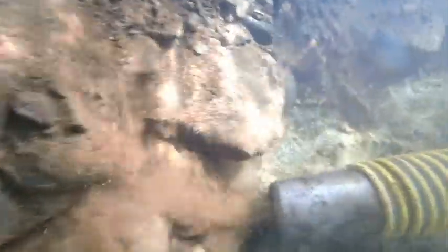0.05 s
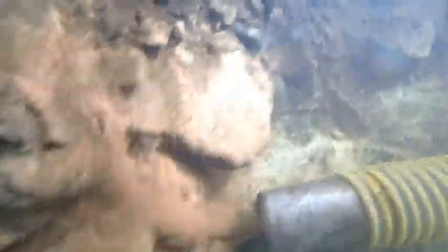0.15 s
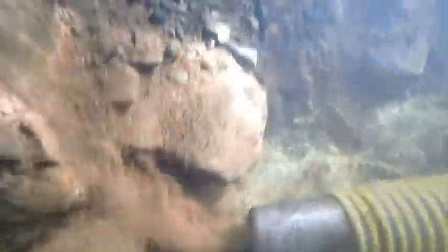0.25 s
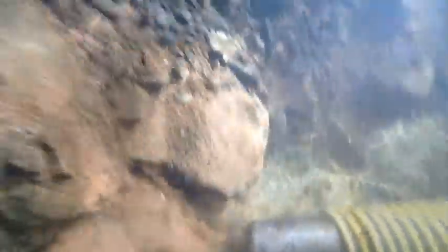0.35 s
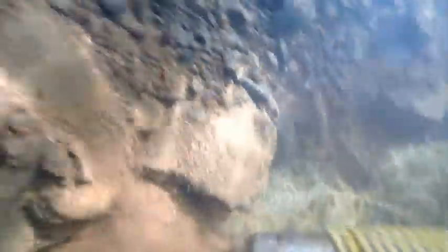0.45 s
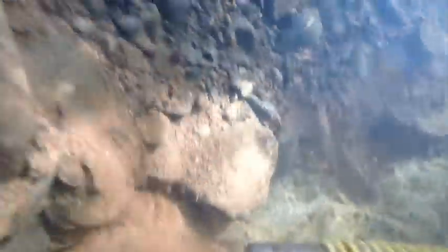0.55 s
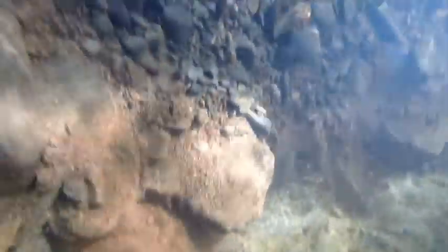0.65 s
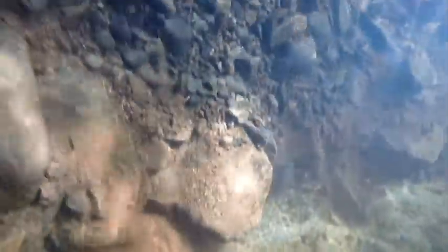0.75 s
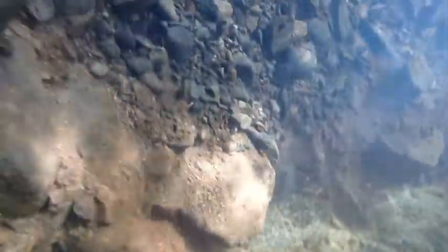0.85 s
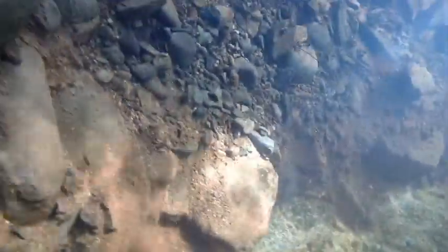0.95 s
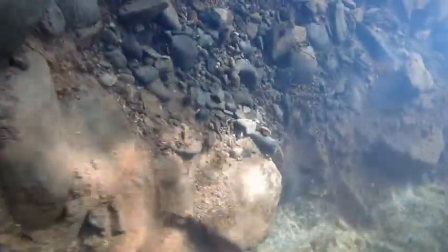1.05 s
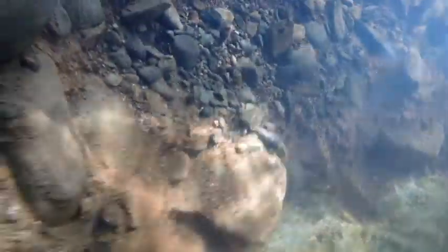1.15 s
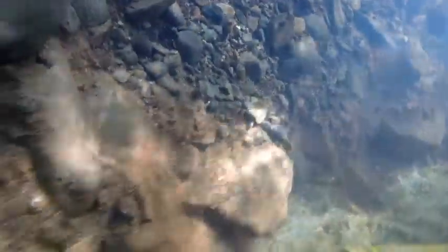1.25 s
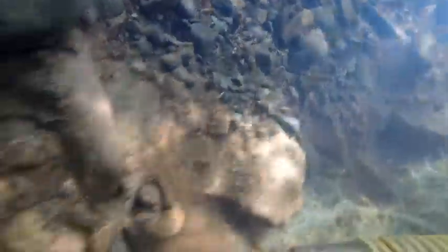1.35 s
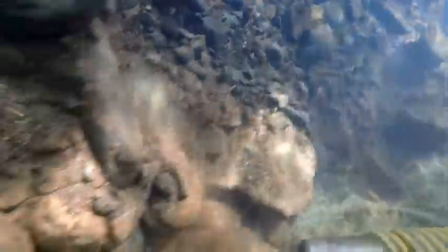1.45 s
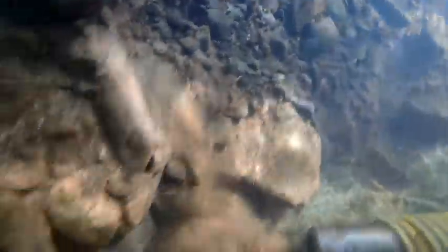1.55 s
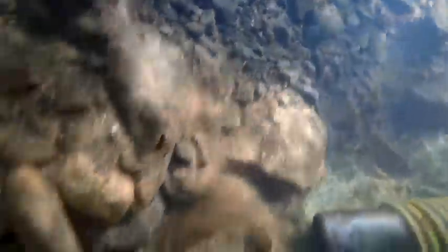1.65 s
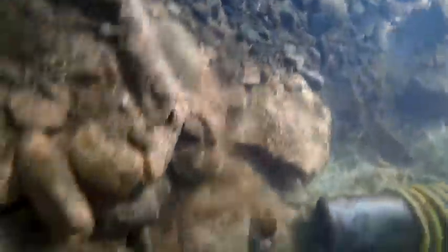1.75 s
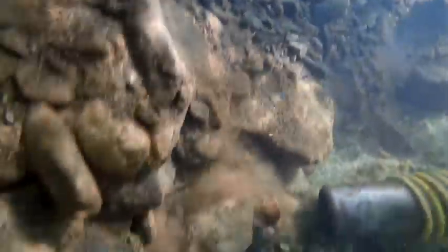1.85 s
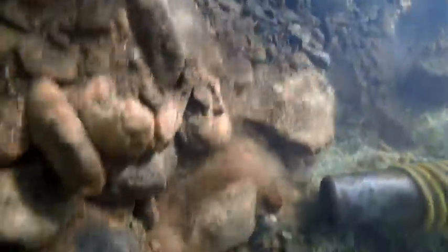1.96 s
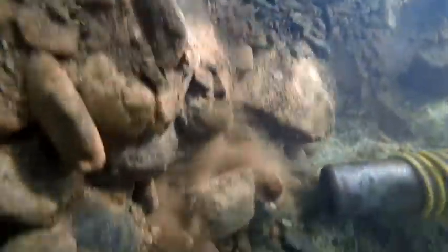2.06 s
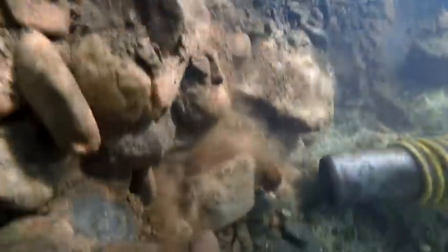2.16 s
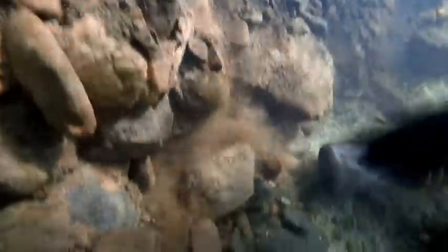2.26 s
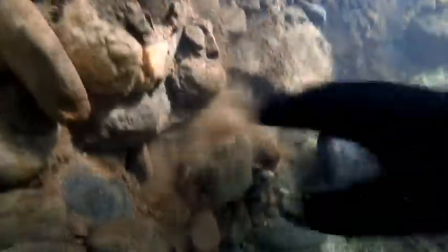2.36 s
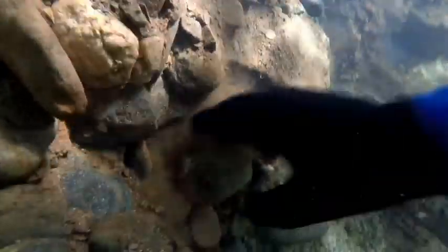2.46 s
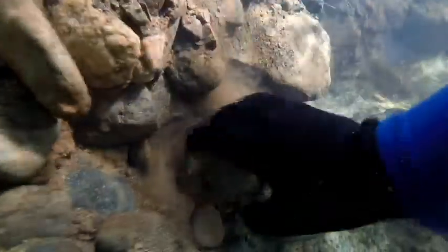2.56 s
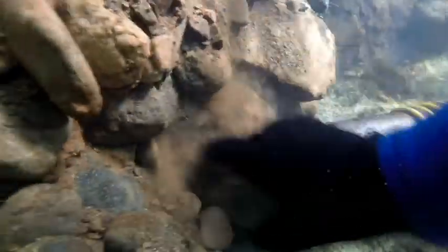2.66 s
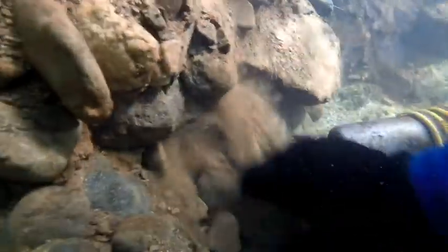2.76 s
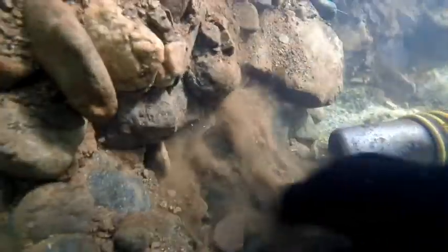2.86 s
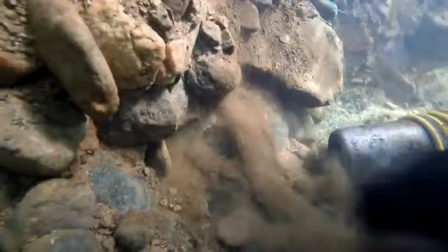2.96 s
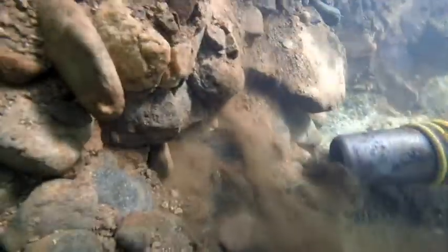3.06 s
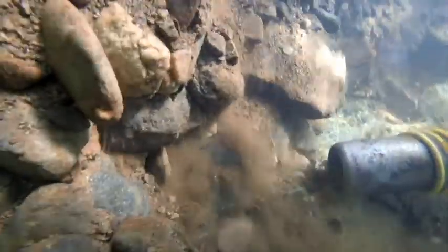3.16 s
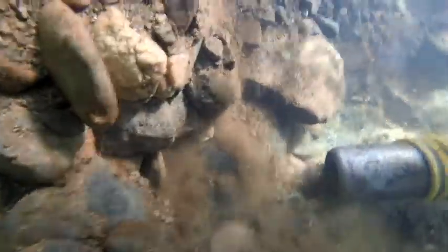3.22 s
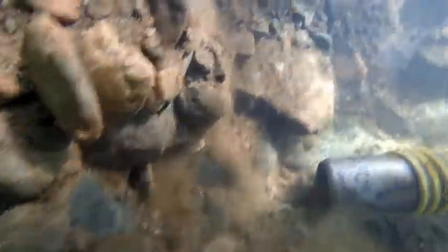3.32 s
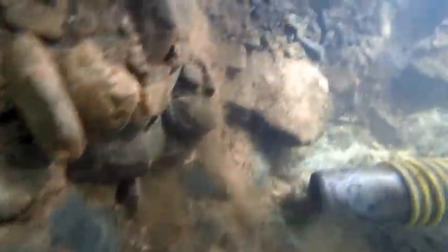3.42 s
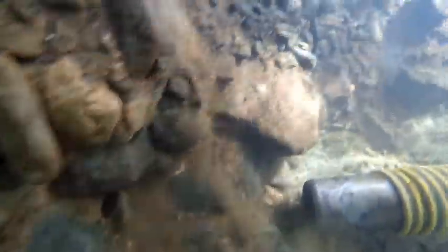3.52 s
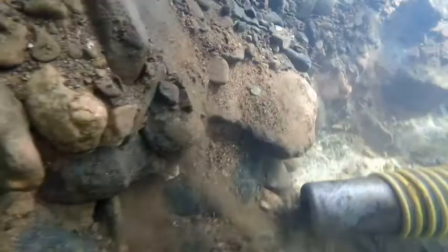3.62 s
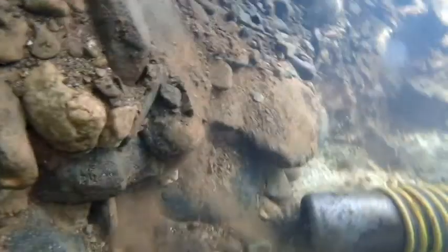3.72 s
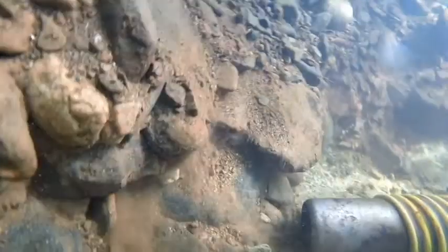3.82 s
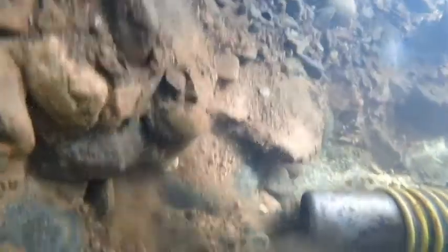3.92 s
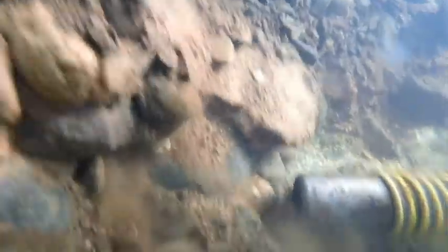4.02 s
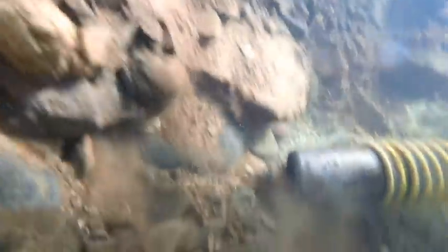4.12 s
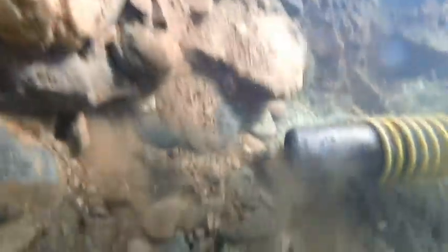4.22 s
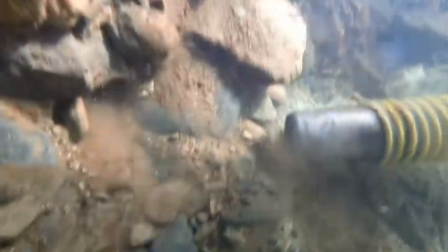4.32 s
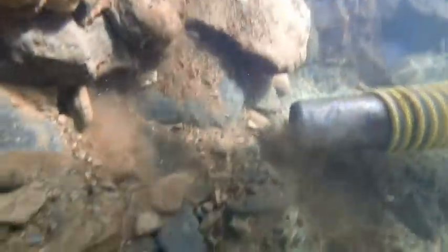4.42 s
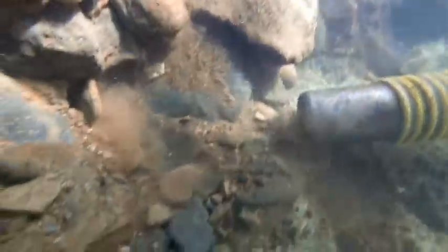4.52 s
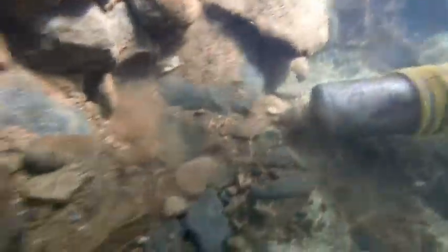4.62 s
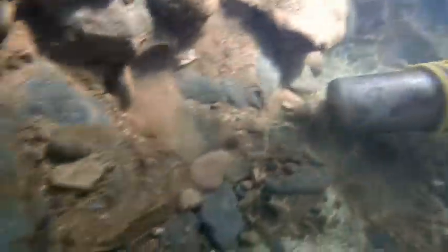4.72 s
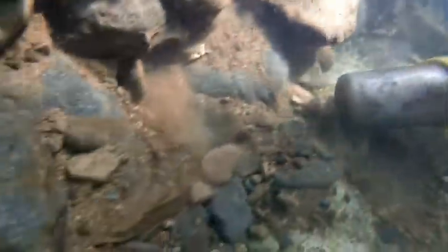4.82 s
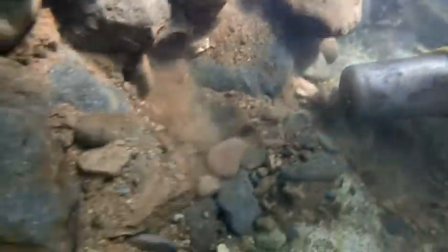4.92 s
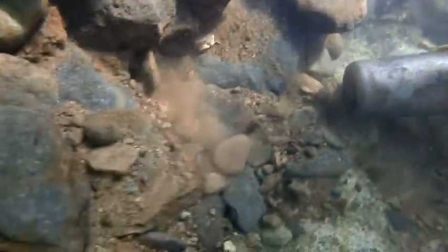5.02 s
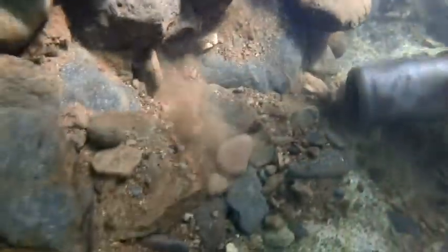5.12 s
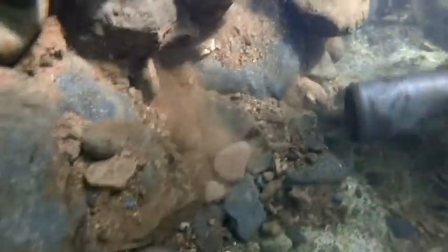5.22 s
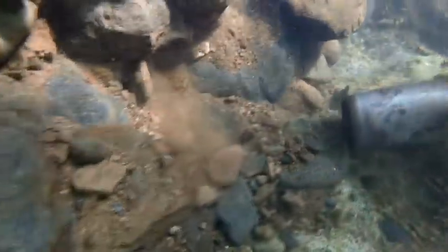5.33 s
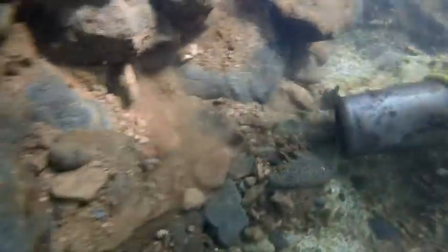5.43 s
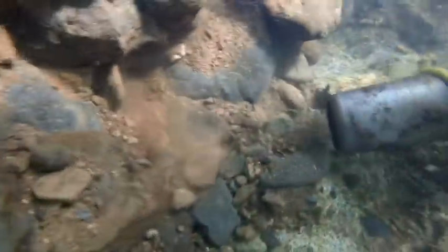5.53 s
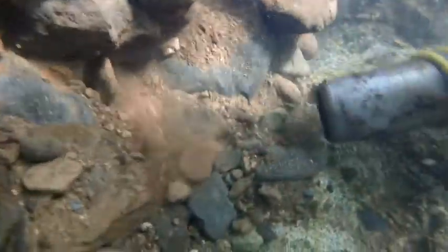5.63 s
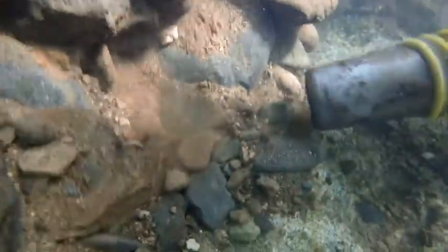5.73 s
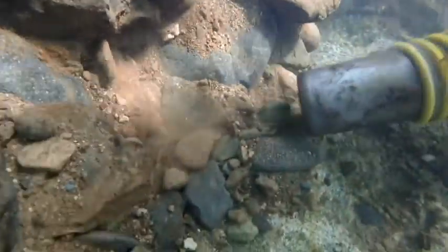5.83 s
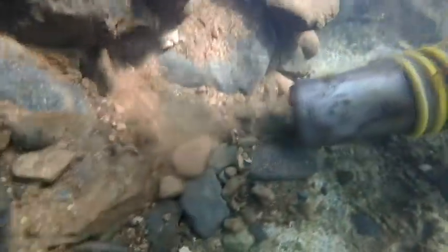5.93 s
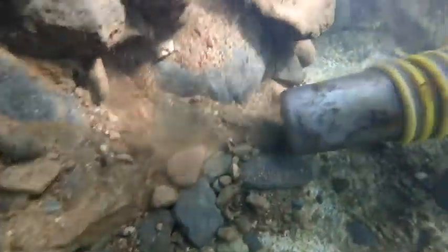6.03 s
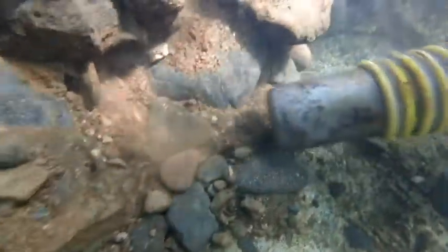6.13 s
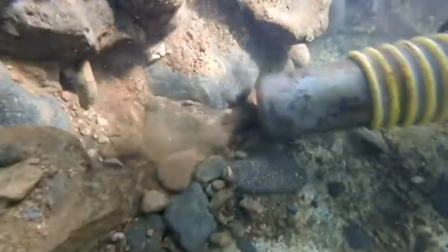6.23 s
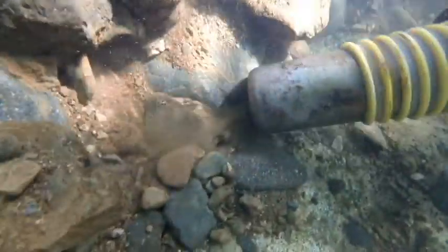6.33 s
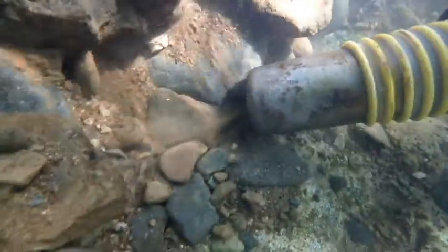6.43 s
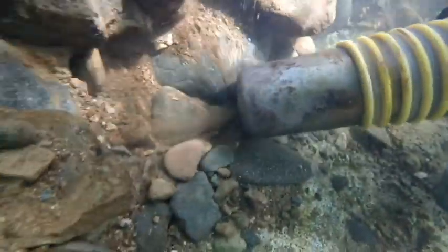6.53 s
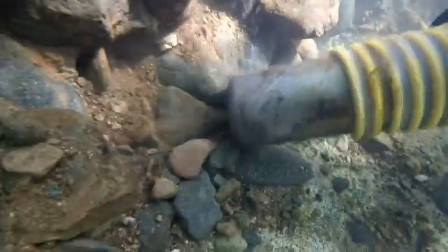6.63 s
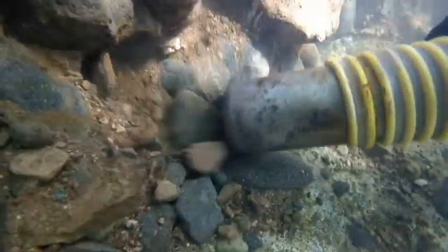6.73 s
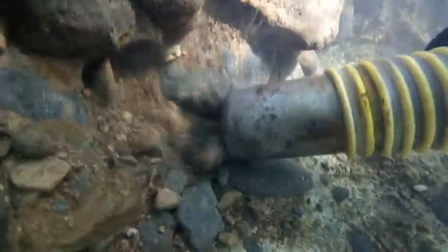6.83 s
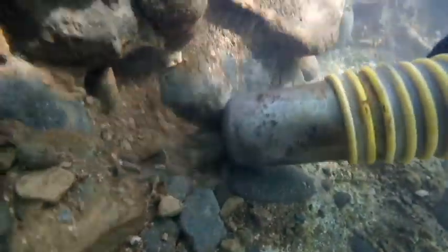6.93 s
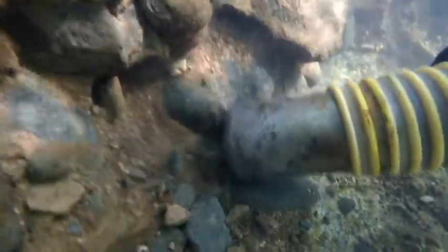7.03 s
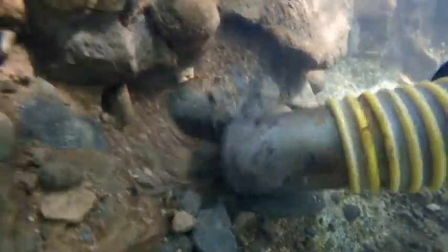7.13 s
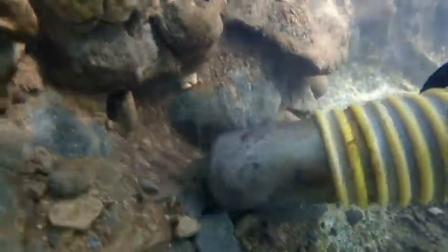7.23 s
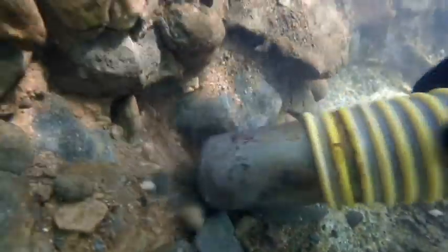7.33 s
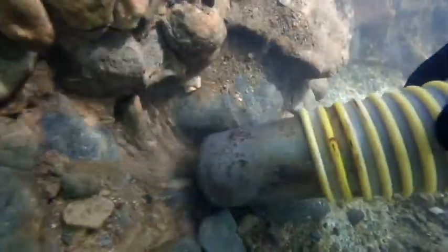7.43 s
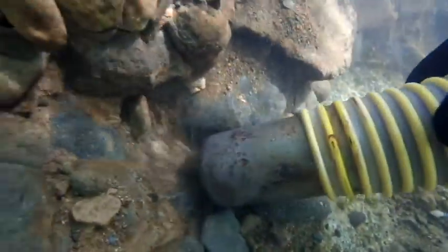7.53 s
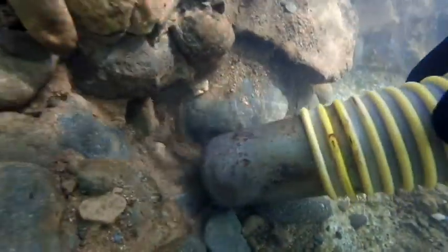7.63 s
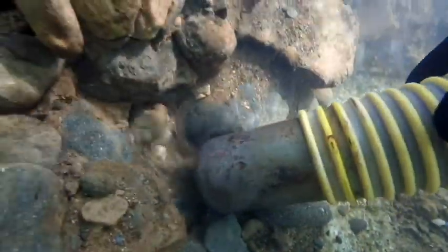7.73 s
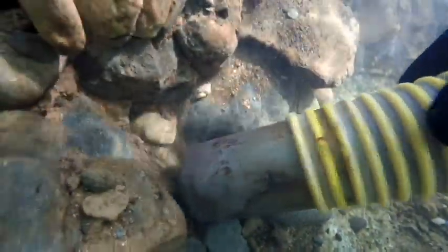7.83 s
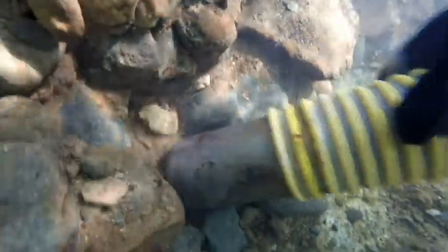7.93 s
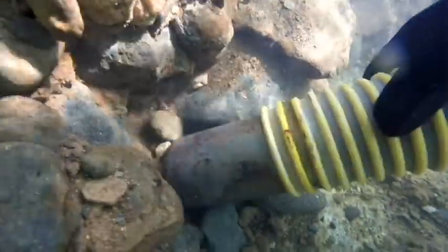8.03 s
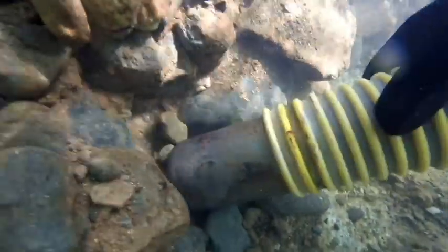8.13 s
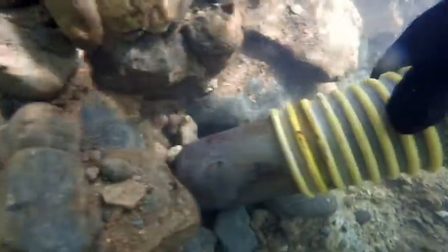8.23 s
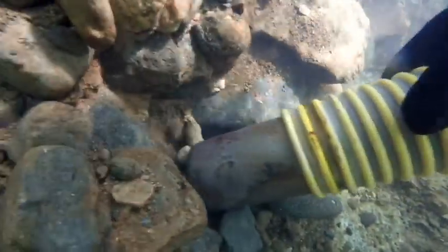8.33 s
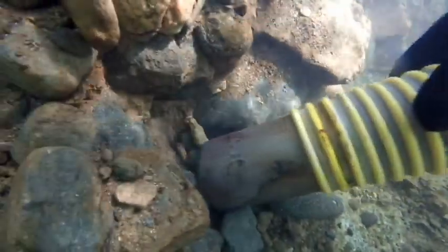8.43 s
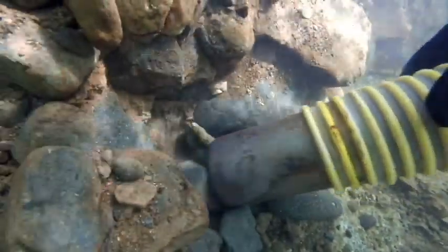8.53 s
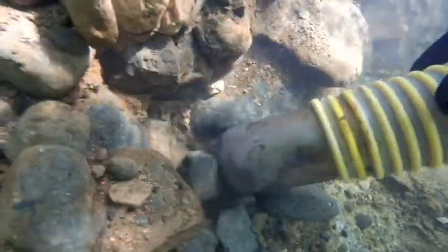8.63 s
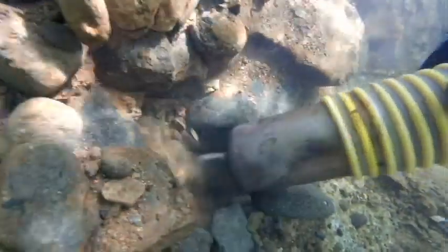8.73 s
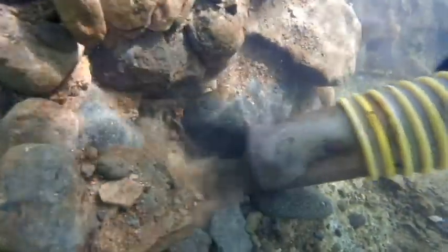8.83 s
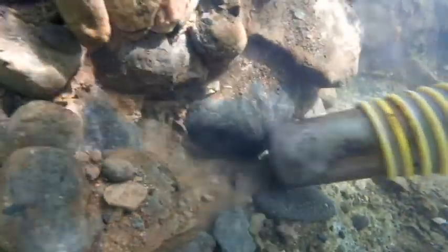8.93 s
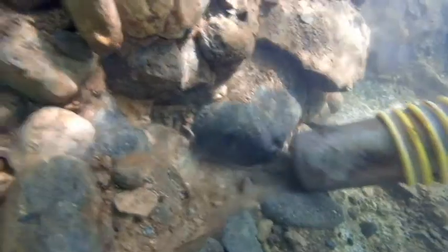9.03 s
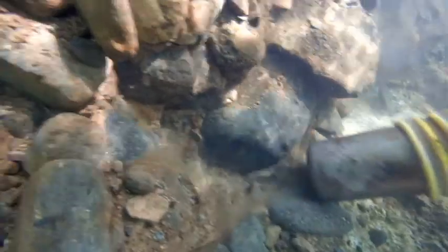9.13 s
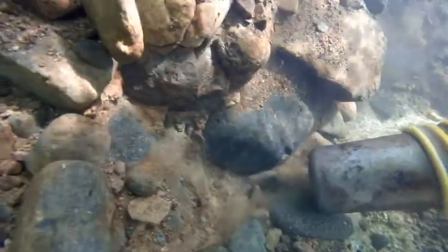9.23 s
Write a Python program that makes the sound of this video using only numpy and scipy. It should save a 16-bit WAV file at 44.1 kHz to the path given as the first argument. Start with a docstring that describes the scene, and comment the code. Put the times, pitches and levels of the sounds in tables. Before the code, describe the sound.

Underwater in a stream, a low engine drones while cobbles grind and grit ticks, then stones clack into a steel suction nozzle with watery gulps.

```python
"""A stream bed, heard from inside a camera housing under water, where a suction dredge works.
Cobbles grind in spells as bursts of tiny slips, one is rolled aside by hand, and chips of grit tick.
The nozzle comes near and swallows loads of gravel: stones clack into the steel as struck resonators,
noise rattles up the hose and the water column gulps as a damped oscillator. The pump engine drones
in shaft orders; the housing colours the solid impacts and the flow, with a strong ring near 2.7 kHz."""
import sys
import numpy as np
from scipy import signal
from scipy.fft import rfft, irfft
from scipy.io import wavfile
from scipy.ndimage import uniform_filter1d, map_coordinates

SR = 44100
rng = np.random.default_rng(int(sys.argv[2]) if len(sys.argv) > 2 else 0)


def wav_out(sig):
    """Save sig, one row per channel (or a flat mono array), as 16-bit PCM at SR to the path in sys.argv[1]."""
    wavfile.write(sys.argv[1], SR, np.round(np.clip(np.atleast_2d(sig).T, -1, 1) * 32767).astype(np.int16))


N = 408807
TIME = np.arange(N) / SR
BLOW = TIME[:4096]  # time axis of a single event [s]


def from_db(db):
    """Logarithmic level: decibels to amplitude gain."""
    return 10 ** (np.asarray(db) / 20)


def rms_one(x):
    """Power normalization: scale to unit mean square."""
    return x / np.sqrt(np.mean(x ** 2) + 1e-20)


def top_one(x, size):
    """Short-time power normalization: the loudest stretch of size samples gets unit power."""
    return x / np.sqrt(uniform_filter1d(x ** 2, size).max() + 1e-20)


def in_time(rows):
    """Linear interpolation: each column of a curve at every sample."""
    s, *columns = np.transpose(rows)
    return [np.interp(TIME, s, c) for c in columns]


def add(out, s, sound):
    """Superposition: mix a sound in at a time in seconds."""
    i = max(round(s * SR), 0)
    out[i:i + len(sound)] += sound[:N - i]


def drift(rate):
    """Slow random modulation: straight lines between rate random knots per second, unit power."""
    knots = rng.standard_normal(int(N / SR * rate) + 4)
    return rms_one(map_coordinates(knots, [TIME * rate], order=1))


def swell(middle_s, half_s):
    """Gaussian envelope: 1 at its middle, 1/e at half_s from it."""
    return np.exp(-((TIME - middle_s) / half_s) ** 2)


def band(x, low_hz, high_hz):
    """Band limitation by a causal Butterworth filter."""
    edges = [low_hz, min(high_hz, .45 * SR)]
    return signal.sosfilt(signal.butter(2, edges, "band", fs=SR, output="sos"), x)


def through(x, response):
    """Linear system: convolve a force with an impulse response."""
    return signal.oaconvolve(x, response)[:len(x)]


# resonances and notches of the housing: (centre [Hz], width [Hz], gain [dB])
HOUSING_MODES = [(819, 61, -11.5), (1198, 28, 5.5), (1468, 32, -12.5), (1600, 236, 10.5), (1751, 83, -17.5),
                 (1988, 434, 16), (2233, 64, -17.5), (2706, 265, 16), (3018, 324, 13.5), (3533, 110, -3),
                 (3510, 166, 13), (4193, 560, 11), (4790, 137, -12.5), (6845, 690, 7), (7770, 600, -6.5),
                 (8826, 1040, 11), (10660, 1000, -3.5), (13020, 1840, 16.5)]


def housed(colour, size=4096):
    """Minimum phase: causal impulse response of a force spectrum heard through the housing."""
    hz = np.maximum(np.fft.rfftfreq(size, 1 / SR), 1)
    knots, knots_db = np.transpose(colour)
    db = np.interp(np.log(hz), np.log(knots), knots_db)
    for centre, width, peak_db in HOUSING_MODES:
        db = db + peak_db / (1 + (2 * (hz - centre) / width) ** 2)
    cepstrum = irfft(np.log(from_db(db)))
    # folding the cepstrum onto positive time makes the response causal
    fold = 1 + np.sign(size / 2 - np.arange(size))
    fold = fold * np.r_[.5, np.ones(size - 1)]
    return irfft(np.exp(rfft(cepstrum * fold)))


def grains(per_s, spread_db):
    """Shot noise: random contacts of very uneven strength and either sign."""
    sizes = from_db(spread_db * np.minimum(rng.exponential(1, N), 4)) * rng.choice([-1, 1], N)
    return sizes * (rng.random(N) < per_s / SR)


def snap(crush, crush_s):
    """Impulsive contact: a click and a decaying noise burst, which gives each one its own colour."""
    force = crush * rng.standard_normal(len(BLOW)) * np.exp(-BLOW / crush_s)
    force[0] += 1
    return force


# level at which the engine drone is heard, with dips, before its orders are weighted:
# (time [s], level [dB])
DRONE_LEVEL = [(0, -41.5), (.9, -46), (2.4, -43.5), (6.65, -42), (7.0, -56), (7.9, -36), (8.25, -44),
               (8.65, -37), (9.27, -56)]
# engine orders: (multiple of the shaft speed [1], mean level [dB])
ENGINE_ORDERS = [(1, 3.5), (1.5, -11.5), (2, -17.5), (2.5, -13), (3, -11.5), (4, -18), (4.5, -13), (5, -19)]
SHAFT_HZ = 43.2  # mean shaft speed


def engine(wander=0.00733, uneven_db=0.5):
    """Order spectrum of a four-stroke: a strong shaft tone with wavering whole and half orders."""
    turns = np.cumsum(SHAFT_HZ * (1 + wander * drift(3.2))) / SR
    drone = np.zeros(N)
    for order, db in ENGINE_ORDERS:
        waver_db = uneven_db * min(order - 1, 1) * drift(8.4)  # no level waver on the shaft tone
        drone += from_db(db + waver_db) * np.sin(2 * np.pi * (order * turns + rng.random()))
    return from_db(in_time(DRONE_LEVEL)[0]) * drone


# loads of gravel swallowed at once: (time of the peak [s], half length [s], swell of the gravel [dB])
GRAVEL_LOADS = [(6.35, 0.072, 3.5), (6.782, 0.1, 9.5), (7.994, 0.14, 6.5), (8.705, 0.14, 5.5)]


def loads_db():
    """Level modulation: how far the passing loads raise the gravel flow."""
    return sum(db * swell(s, half_s) for s, half_s, db in GRAVEL_LOADS)


# swirl at the mouth, louder as the nozzle comes near: (time [s], relative level [dB])
SWIRL_LEVEL = [(0, -54.5), (.95, -48), (1.9, -53.5), (3.2, -49), (4.4, -55), (6.1, -44.5), (6.6, -42),
               (9.27, -42)]
# gravel going up the hose, choked briefly by a big stone: (time [s], relative level [dB])
GRAVEL_LEVEL = [(0, -39), (.5, -42), (1.3, -42), (2.0, -38.5), (3.0, -39), (4.4, -39), (6.1, -39),
                (6.9, -34.5), (7.12, -45), (7.5, -34), (8.25, -37), (9.27, -32)]
# hiss of sand: (time [s], relative level [dB])
SAND_LEVEL = [(0, -46), (.6, -49.5), (1.3, -43.5), (1.9, -49.5), (3.15, -43.5), (4.4, -54), (5.45, -47),
              (5.8, -57.5), (6.3, -40), (7.12, -48.5), (7.55, -36.5), (8.25, -44), (8.75, -49), (9.27, -57)]
SAND_FOLLOWS, WASH_FOLLOWS = 0.78, 0.54  # share of a load's swell [dB per dB]
WASH_DB, WASH_RISES = -55, 0.12  # base level of silt washing about; share of the swirl's rise
# a cloud of silt is stirred up: peak, rise and settling times, boost of the wash
CLOUD_S, CLOUD_RISE_S, CLOUD_SETTLE_S, CLOUD_DB = 3.54, 0.13, 0.47, 6.5


def flow_levels():
    """Common modulation: each load swells swirl, gravel, sand and wash [dB]; the cloud lifts the wash."""
    (swirl,), (gravel,), (sand,) = in_time(SWIRL_LEVEL), in_time(GRAVEL_LEVEL), in_time(SAND_LEVEL)
    load = loads_db()
    cloud = swell(CLOUD_S, np.where(TIME < CLOUD_S, CLOUD_RISE_S, CLOUD_SETTLE_S))
    wash = WASH_DB + WASH_RISES * (swirl - swirl.min()) + WASH_FOLLOWS * load + CLOUD_DB * cloud
    return swirl + load, gravel + load, sand + SAND_FOLLOWS * load, wash


# force spectrum of the swirl, before the housing: (frequency [Hz], level [dB])
SWIRL_SPECTRUM = [(20, -34), (50, -2), (90, -13.5), (150, 2), (215, 5), (270, -10.5), (330, -8),
                  (420, -31.5), (900, -50)]
# force spectrum of the washing silt, before the housing: (frequency [Hz], level [dB])
WASH_SPECTRUM = [(200, -41), (400, -0.5), (700, -1), (1150, 0.5), (1700, -7.5), (3000, -45)]
# force spectrum of the gravel, before the housing: (frequency [Hz], level [dB])
GRAVEL_SPECTRUM = [(800, -23.5), (1500, -11.5), (2600, 4), (3200, -8.5), (4500, -5.5), (6500, -25),
                   (12000, -36)]


def flow(swirl_db=1.5, gravel_db=-4.5, lump_db=-8.5, sand_db=-3.0, tick_db=-0.5):
    """Filtered random excitation: water swirls, gravel and sand rattle, larger bits click singly."""
    swirl_level, gravel_level, sand_level, wash_level = flow_levels()
    clumps = drift(55)

    def rattle(force, colour, clump_db):
        """Amplitude modulation: a force that comes in clumps, heard through the housing."""
        return rms_one(through(force * from_db(clump_db * clumps), housed(colour)))

    eddies = rng.standard_normal(N) * from_db(2.2 * drift(45))
    swirl = rms_one(through(eddies, housed(SWIRL_SPECTRUM)))
    wash = rattle(grains(per_s=1300, spread_db=1.5), WASH_SPECTRUM, clump_db=3.5)
    gravel = from_db(gravel_db) * rattle(rng.standard_normal(N), GRAVEL_SPECTRUM, clump_db=2.5)
    lumps = grains(per_s=160, spread_db=7.0)
    lumps = from_db(lump_db) * rattle(lumps, COBBLE_SPECTRUM, clump_db=2.5)
    sand = rng.standard_normal(N) * from_db(4.4 * drift(400))
    sand = from_db(sand_db) * rattle(sand, GRIT_SPECTRUM, clump_db=2.0)
    water = from_db(swirl_level + swirl_db) * swirl + from_db(wash_level) * wash
    coarse = from_db(gravel_level) * (gravel + lumps)
    fine = from_db(sand_level) * (sand + from_db(tick_db) * ticking())
    return water + coarse + fine


def ticking(count=260, spread_db=4.0):
    """Random point process: smaller chips at chance moments, unit power overall."""
    out, response = np.zeros(N), housed(GRIT_SPECTRUM)
    for s in rng.uniform(0, N / SR, count):
        add(out, s, from_db(spread_db * min(rng.normal(), 2)) * chip(response))
    return rms_one(out)


LITTLE_GULP_DB, LITTLE_GULP_HZ = 7.5, 189  # level against the swirl curve; usual pitch


def little_gulps(count=60, spread_db=5.0, pitch_spread=.28):
    """Vortex shedding: eddies break off at random, following the swirl; rows (s, dB, Hz)."""
    moments = rng.uniform(0, TIME[-1], count)
    chance = np.clip(rng.standard_normal((count, 2)), -2, 1.5)
    levels = np.interp(moments, TIME, flow_levels()[0]) + LITTLE_GULP_DB + spread_db * chance[:, 0]
    pitches = LITTLE_GULP_HZ * np.exp(pitch_spread * chance[:, 1])
    return list(zip(moments, levels, pitches))


# the deepest gulps of water: (time [s], level of the loudest 4 ms [dB], pitch [Hz])
DEEP_GULPS = [(2.846, -23.5, 178), (6.356, -21, 288), (6.731, -15, 624), (7.095, -24, 194.8),
              (7.135, -17, 206), (7.168, -24, 202.7), (7.317, -20, 183), (7.915, -22.5, 76.1),
              (8.725, -12.5, 217), (8.78, -21.5, 59.6), (8.842, -19.5, 192), (8.929, -23.5, 208)]


def gulps(cycles=1.77, rise_s=0.0032, churn=0.27, push=0.24, push_hz=95):
    """Damped oscillator: the checked water column swings briefly, with a low push and churning."""
    out = np.zeros(N)
    for s, db, hz in DEEP_GULPS + little_gulps():
        churning = churn * rms_one(band(rng.standard_normal(len(BLOW)), 40, 445))
        swing = (np.sin(2 * np.pi * hz * BLOW) + churning) * np.exp(-BLOW * hz / cycles)
        thud = push * np.sin(2 * np.pi * push_hz * BLOW) * np.exp(-BLOW * push_hz)
        gulp = (swing + thud) * (1 - np.exp(-BLOW / rise_s)) * (1 - BLOW / BLOW[-1])
        add(out, s, from_db(db) * top_one(gulp, size=176))
    return out


def chip(response):
    """Resonant impact: a snap of one bit of grit, tinted by the pitch of the grain."""
    blow = through(snap(crush=0.51, crush_s=0.0024), response)
    hz = rng.uniform(5300, 10700)
    return top_one(.5 * blow + band(blow, hz / 1.16, hz * 1.16), size=176)


# the sharpest chips of grit: (time [s], relative level [dB])
SHARP_CHIPS = [(0.1055, -22.5), (0.18, -15.5), (0.2358, -20), (0.598, -9.5), (0.7036, -18.5),
               (3.161, -15.5), (3.5399, -21), (3.919, -22), (4.6485, -18.5), (4.991, -17.5), (5.2593, -17),
               (5.864, -15)]
# force spectrum of grit, also of sand and ticks in the flow: (frequency [Hz], level [dB])
GRIT_SPECTRUM = [(1000, -38.5), (3000, -1.5), (4700, -8.5), (6000, 3.5), (9000, -3), (13500, -6),
                 (15000, -7), (16000, -38)]


def chips(level_db=-7.0):
    """Impulse excitation: single bits of grit snap against steel and rock."""
    out, response = np.zeros(N), housed(GRIT_SPECTRUM)
    for s, db in SHARP_CHIPS:
        add(out, s, from_db(db + level_db) * chip(response))
    return out


# single cobble slides, strong and weak, that stand out at their moment:
# (time of the loudest moment [s], relative level [dB])
SINGLE_SLIDES = [(0.781, -13), (0.896, -13.5), (0.951, -16.5), (0.999, -13), (1.067, -17), (1.108, -14),
                 (1.211, -15), (1.238, -15), (1.274, -14), (1.364, -14), (1.468, -14.5), (1.564, -14),
                 (1.76, -20.5), (2.064, -8), (2.141, -12), (2.26, -14), (2.345, -12), (2.579, -10),
                 (2.801, -12.5), (2.908, -11.5), (3.074, -11), (3.22, -12.5), (3.416, -16.5), (4.246, -22),
                 (6.757, -15), (6.814, -7), (8.65, -11)]
# force spectrum of cobbles, also of lumps in the flow: (frequency [Hz], level [dB])
COBBLE_SPECTRUM = [(300, -42), (750, -19.5), (1000, -8.5), (1900, -10.5), (2620, 2.5), (3100, -7.5),
                   (4500, -8.5), (5050, -2), (6200, -22), (7400, -5.5), (9000, -21.5), (15000, -26.5)]


def cobbles(level_db=-7.5, slide_s=0.0038, slips_per_s=2500, ring_db=-3.0, settle_db=-10.0):
    """Frictional excitation: a swell of slips pumps a housing ring; a weaker settling slide follows."""
    out, response = np.zeros(N), housed(COBBLE_SPECTRUM)
    mode = np.sin(2 * np.pi * 2660 * BLOW) * np.exp(-BLOW / .005)
    lead = BLOW[-1] / 3  # time of the main slide within an event

    def slide(peak_s):
        """Asymmetric exponential envelope: pressure builds quickly and eases off."""
        return np.exp(-np.maximum((peak_s - BLOW) * 1.5, BLOW - peak_s) / slide_s)

    for s, db in SINGLE_SLIDES + spell_slides():
        later = rng.uniform(.016, .045)  # delay of the settling slide [s]
        pressure = slide(lead) + from_db(settle_db) * slide(lead + later)
        slips = rng.standard_normal(len(BLOW)) * (rng.random(len(BLOW)) < slips_per_s / SR)
        grind = top_one(through(slips * pressure, response), size=300)
        grind = grind + from_db(ring_db) * top_one(through(grind, mode), size=300)
        add(out, s - lead - .002, from_db(db + level_db) * top_one(grind, size=300))
    return out


# spells in which shifted cobbles keep grinding:
# (start [s], end [s], relative level of a usual slide [dB])
GRINDING_SPELLS = [(0.8, 1.663, -20.5), (2.06, 2.47, -19.5), (2.777, 2.967, -14.5), (2.999, 3.252, -30.5)]
SLIDES_PER_S, SLIDE_SPREAD_DB = 19, 2


def spell_slides(count=24):
    """Stick-slip: through each spell the cobbles slide at an uneven pace; rows (s, dB)."""
    rows = []
    for start, end, db in GRINDING_SPELLS:
        moments = start + (np.arange(count) + rng.random(count)) / SLIDES_PER_S
        levels = db + SLIDE_SPREAD_DB * rng.standard_normal(count)
        rows += [(s, slide_db) for s, slide_db in zip(moments, levels) if s < end]
    return rows


SCRAPE_DB, SCRAPE_FADE_S = -16.5, 0.11  # level against a spell's figure; decay constant at either end


def scraping():
    """Sustained friction: gravel caught between shifting cobbles scrapes through each spell."""
    level = np.zeros(N)
    for start, end, db in GRINDING_SPELLS:
        outside_s = np.maximum(np.maximum(start - TIME, TIME - end), 0)
        level += from_db(db + SCRAPE_DB) * np.exp(-outside_s / SCRAPE_FADE_S)
    force = grains(per_s=810, spread_db=5.0) * from_db(3.0 * drift(50))
    return level * rms_one(through(force, housed(COBBLE_SPECTRUM)))


# force spectrum of the rolling cobble's knocks: (frequency [Hz], level [dB])
ROLL_SPECTRUM = [(40, -18), (90, -5.5), (160, 4), (230, 0.5), (320, -5.5), (390, -19.5), (600, -23),
                 (900, -31), (2000, -60)]
ROLL_S, ROLL_HALF_S = 2.734, 0.2  # a cobble is rolled aside: middle and half length


def rolling(level_db=-28.5):
    """Repeated impact: a cobble tumbles over its neighbours in a swell of dull knocks."""
    knocks = grains(per_s=220, spread_db=2.0) * from_db(3.9 * drift(40))
    knocks = rms_one(through(knocks, housed(ROLL_SPECTRUM)))
    return from_db(level_db) * swell(ROLL_S, ROLL_HALF_S) * knocks


# the biggest stones striking the nozzle, levels relative, ring against clack:
# (time [s], clack [dB], body [dB], crack [dB], ring [dB])
BIG_STONES = [(3.489, -13.5, -35.5, -27, -8), (5.353, -10, -26.5, -29, -10), (5.3817, 2, -17, -22.5, 5.5),
              (5.4914, -14.5, -41, -27, 6), (5.5367, -12, -46, -26, 0), (5.5515, -13, -49, -40, 7),
              (5.9902, 0, -17.5, -47, 4.5), (6.0568, -5, -21.5, -65, -28), (6.1206, -11, -19.5, -33, 1),
              (6.141, -15.5, -49, -17.5, 6), (6.2522, -5, -39, -15.5, 1.5), (6.318, -8, -43, -23, -2),
              (6.3576, -3, -20.5, -32, 2.5), (6.3755, -4, -26, -19.5, -11), (6.7255, -2.5, -13, -24, -16.5),
              (6.8055, -1, -19, -24, -6), (6.8274, -3, -18.5, -21, 1), (6.8654, 2.5, -22, -33, -4.5),
              (7.0315, -4, -24.5, -29, -19), (7.25, -5.5, -24.5, -14, -16.5), (7.3832, -9.5, -22, -32, -16),
              (7.435, -9, -31, -32, -5), (7.7755, -8.5, -31, -18.5, 3), (7.9923, -14, -45, -19, -10.5),
              (8.0042, 0, -17, -23, -15), (8.0524, -3, -19.5, -20, -10), (8.0753, -3.5, -17.5, -18.5, -11),
              (8.1319, -3.5, -26.5, -25, 8), (8.2655, -11, -30, -26.5, -11), (8.3562, -11, -40, -37, -19),
              (8.6311, -8, -27, -26, 0), (8.673, -6, -17, -28.5, -4.5), (8.7193, 1, -14.5, -24.5, 2),
              (8.842, -3, -12, -22, 6.5), (8.878, -1, -19, -52, -25), (8.9189, -7, -25, -51, -8),
              (9.0042, -2, -32, -35, -17.5), (9.022, -0.5, -35, -26.5, -12.5), (9.104, -4.5, -26, -24, -10),
              (9.1175, -2, -42, -29, -17), (9.1421, 1.5, -54, -25, -12)]
# force spectrum of stones and pebbles, before the housing: (frequency [Hz], level [dB])
STONE_SPECTRUM = [(100, -15), (300, -5), (650, -5), (1100, -7.5), (2000, -14.5), (2900, -2), (4000, -10.5),
                  (6000, -7.5), (10000, -16.5), (15000, -24.5)]
# what a square hit leaves ringing: (frequency [Hz], level [dB], 60 dB decay time [s])
HOUSING_RING = [(2755, 0, .04), (4590, -32, .05), (6930, -25, .04)]


def stones(clack_db=-8.0, body_db=-3.0, steel_decay_s=0.00017):
    """Modal impact: each stone gives a click and a brief crunch; square hits ring the housing."""
    out, response = np.zeros(N), housed(STONE_SPECTRUM)
    ring = np.zeros(len(BLOW))
    for hz, db, t60 in HOUSING_RING:
        ring += from_db(db - 60 * BLOW / t60) * np.sin(2 * np.pi * hz * BLOW)
    ring = ring * (1 - np.exp(-BLOW / .0015))  # the ring builds up
    for s, level_db, low_db, high_db, ring_db in BIG_STONES:
        scatter = .015 * rng.standard_normal(len(BLOW)) * np.exp(-BLOW / .008)
        blow = through(snap(crush=0.19, crush_s=0.0025) + scatter, response)
        # the steel answers at a pitch that depends on where it is struck
        steel_hz = 2950 * (1 + rng.normal(0, .04))
        steel = np.sin(2 * np.pi * steel_hz * BLOW) * np.exp(-BLOW / steel_decay_s)
        clack = top_one(through(band(blow, 1780, 9500), steel), size=176)
        body = top_one(band(band(blow, 87, 2000), 88, 1700), size=176)
        crack = top_one(band(band(blow, 5500, 15700), 4700, 20000), size=176)
        add(out, s, from_db(level_db + clack_db) * (clack + from_db(ring_db) * ring))
        add(out, s, from_db(low_db + body_db) * body + from_db(high_db) * crack)
    return out


DIG_START_S = 6.25  # the nozzle is in the gravel from here


def pebbles(count=170, stray_db=4.0, spread_db=7.0):
    """Inhomogeneous point process: dry taps come thicker and stronger with the gravel flow."""
    out, response, gravel_level = np.zeros(N), housed(STONE_SPECTRUM), flow_levels()[1]
    passed = np.cumsum(from_db(gravel_level) * (TIME > DIG_START_S))
    # equal shares of the gravel passed are equally likely to hold a tap
    moments = np.interp(rng.random(count), passed / passed[-1], TIME)
    chance_db = spread_db * np.minimum(rng.normal(size=count), 1.8)
    levels = np.interp(moments, TIME, gravel_level) + stray_db + chance_db
    for s, db in zip(moments, levels):
        tap = through(snap(crush=0.24, crush_s=0.0015), response)
        add(out, s, from_db(db) * top_one(tap, size=176))
    return out


def scene():
    """Superposition: all sources reach the one microphone."""
    water = engine() + flow() + gulps()
    bed = chips() + cobbles() + scraping() + rolling()
    return (water + bed + stones() + pebbles())[None]


def record(dry):
    """Saturation and band limitation: peaks overload, then the top is cut."""
    overloaded = np.clip(dry, -.92, .92)
    # 75 dB down from 16.8 kHz upward
    low_pass = signal.cheby2(16, 75, 16800, fs=SR, output="sos")
    return signal.sosfilt(low_pass, overloaded)


dry = scene()
out = record(dry)
wav_out(out)
```